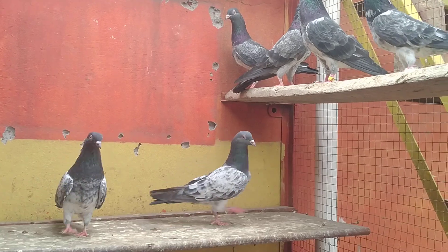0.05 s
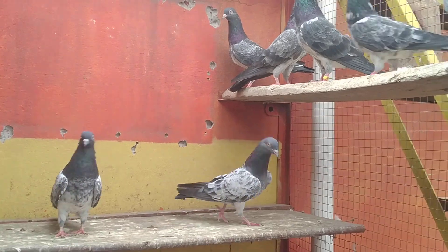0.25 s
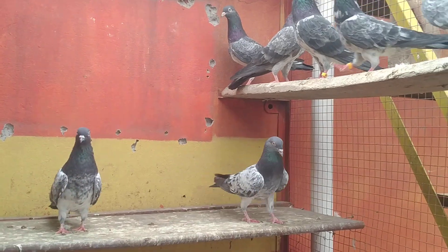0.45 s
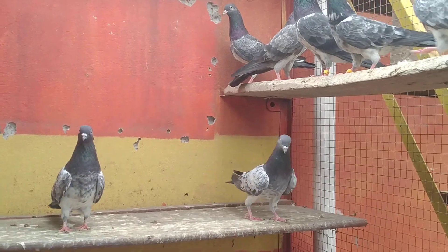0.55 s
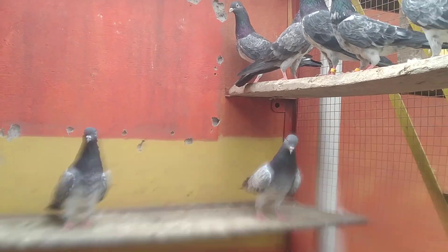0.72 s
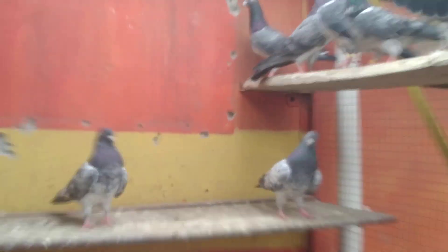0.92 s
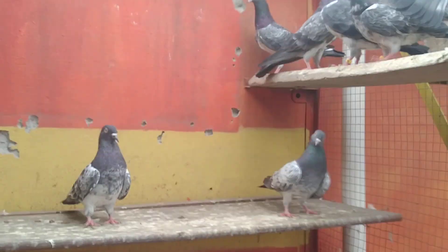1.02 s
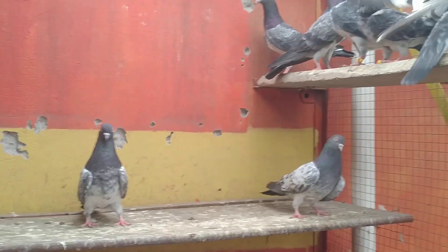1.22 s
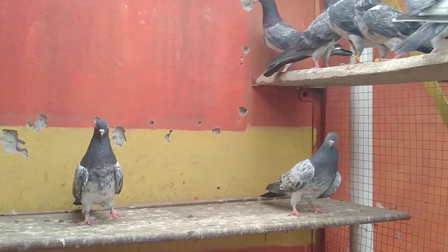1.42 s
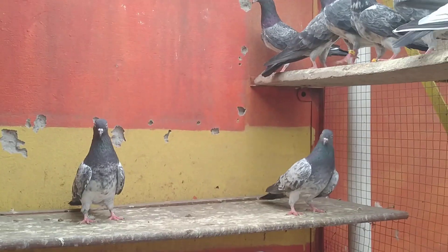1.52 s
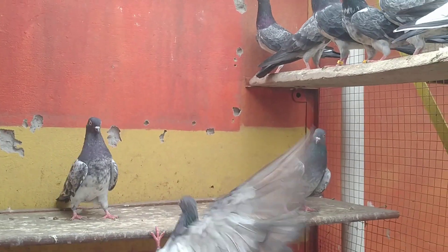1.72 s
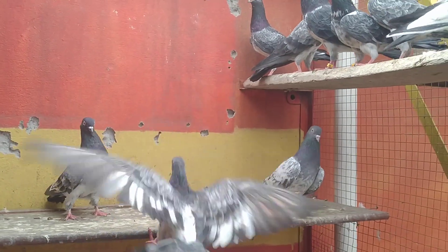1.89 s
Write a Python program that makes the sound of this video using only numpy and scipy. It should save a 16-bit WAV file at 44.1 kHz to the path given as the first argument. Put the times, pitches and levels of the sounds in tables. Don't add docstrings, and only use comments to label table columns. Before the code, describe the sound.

Pigeon wings clap and crackle in rapid bursts, one bird buffeting the microphone as it passes.

```python
import sys
import numpy as np
from scipy import signal
from scipy.fft import rfft, irfft, next_fast_len
from scipy.io import wavfile

SR = 44100
rng = np.random.default_rng(int(sys.argv[2]) if len(sys.argv) > 2 else 0)


def digitize_waveform(pressure):
    field = np.atleast_2d(pressure).T
    bounded = np.clip(field, -1, 1)
    quanta = np.round(bounded * 32767).astype(np.int16)
    wavfile.write(sys.argv[1], SR, quanta)


def makeup_ratio(level_db):
    decades = np.asarray(level_db, float) / 20
    return 10 ** decades


N = 85995
TIME_S = np.arange(N) / SR
STOP = 0.34
ATTACK_S = 0.0003

# pitch_hz [Hz], level_db [dB per Hz]
FEATHER_COLOUR = [(300, -24), (800, -2), (1500, 1), (2600, 2.5), (3600, 1.5), (5000, 4.5), (6000, 4),
                  (7000, -10.5)]


def rms_one(x):
    return x / np.sqrt(np.mean(x ** 2) + 1e-20)


def in_time(rows):
    times_s, values = np.transpose(rows)
    return np.interp(TIME_S, times_s, values)


def band(low_hz, high_hz):
    sos = signal.butter(2, [low_hz, high_hz], "band", fs=SR, output="sos")
    return rms_one(signal.sosfilt(sos, rng.standard_normal(N)))


def coloured(spectrum):
    hz, db = np.transpose(spectrum)
    grid_hz = np.arange(N // 2 + 1) * SR / N + 1
    gain = makeup_ratio(np.interp(np.log(grid_hz), np.log(hz), db))
    return rms_one(irfft(rfft(rng.standard_normal(N)) * gain, N))


def drift(rate_hz):
    r = np.exp(-2 * np.pi * rate_hz / SR)
    noise = rng.standard_normal(N + SR)
    return rms_one(signal.lfilter([1], [1, -2 * r, r * r], noise)[SR:])


def burst(start_s, attack_s, decay_s):
    t = np.maximum(TIME_S - start_s, 0)
    return (1 - np.exp(-t / max(attack_s, 1e-4))) * np.exp(-t / max(decay_s, 3e-4))


def swell(middle_s, width_s):
    return np.exp(-((TIME_S - middle_s) / width_s) ** 2)


def resonance(x, hz, width_hz):
    r = np.exp(-np.pi * width_hz / SR)
    top = [(1 - r * r) / 2, 0, (r * r - 1) / 2]
    return signal.lfilter(top, [1, -2 * r * np.cos(2 * np.pi * hz / SR), r * r], x)


def claps():
    # [dB, relative]
    early_claps = [(0.103, -44.5, 0.042, -15.5, -7.5), (0.16, -30, 0.02, -18, -7),
                   (0.177, -26, 0.022, -11, 12), (0.2029, -8.5, 0.0074, -26.5, 14.5),
                   (0.2105, -14.5, 0.0037, -24.5, 0.5), (0.2225, -15, 0.0081, -20.5, -13),
                   (0.2848, -25.5, 0.0047, -21, 8), (0.2963, -17, 0.011, -27, 6),
                   (0.3392, -13, 0.015, -11, 7), (0.407, -21, 0.035, -9, -8),
                   (0.4347, -23, 0.015, -5.5, -2), (0.4656, -27, 0.0042, -12, 8),
                   (0.5115, -32.5, 0.045, -4, -2), (0.5885, -14, 0.0042, -6, -10.5),
                   (0.6275, -25, 0.013, -16.5, -8), (0.6755, -19.5, 0.017, -17, 1.5),
                   (0.6945, -26, 0.045, -3.5, -5), (0.7525, -4.5, 0.0015, -13, 3.5),
                   (0.7678, -14.5, 0.016, -15.5, 9), (0.8072, -8, 0.005, -3, -10.5),
                   (0.852, -17.5, 0.0036, -21.5, 0)]
    pass_claps = [(0.8997, -3.5, 0.0086, 2, -17), (0.9281, -14, 0.003, -2, -8), (0.9535, -6, 0.004, -8, -4),
                  (0.9914, -1, 0.005, -6, 0), (0.9985, -3, 0.006, -6, -4), (1.0553, -4, 0.006, -4, 1),
                  (1.0861, -7, 0.003, -10, -4), (1.1182, -6, 0.0045, -13, -4),
                  (1.1418, -8, 0.0067, -8, -12), (1.1624, -4.5, 0.0036, -8, -2)]
    late_claps = [(1.2233, -14, 0.0057, -5.5, -5.5), (1.2443, -11, 0.0045, -14.5, -4),
                  (1.2511, -18.5, 0.0069, -5.5, 8), (1.267, -6, 0.0038, -14.5, 1.5),
                  (1.308, -23, 0.02, -17.5, -13), (1.3294, -12.5, 0.015, -14.5, 2),
                  (1.358, -16.5, 0.011, -11.5, -22.5), (1.4334, -12.5, 0.0085, -20, 5.5),
                  (1.4400, -13, 0.0075, -21.5, 5), (1.456, -20.5, 0.025, -11, -7.5),
                  (1.5357, -10, 0.01, -28, -4.5), (1.5785, -16, 0.016, -14, 4),
                  (1.6394, -18, 0.0094, -19, 3), (1.664, -21.5, 0.009, -3, 6.5),
                  (1.6812, -7, 0.0041, -15, -12), (1.7350, -22, 0.012, -10.5, -1),
                  (1.7500, -27, 0.031, -10, -1), (1.831, -31.5, 0.034, -3, 17),
                  (1.909, -38.5, 0.012, -3, -6)]
    snap_hz, snap_width_hz = 4300, 18000
    hiss, puff, snap = np.zeros(N), np.zeros(N), np.zeros(N)
    for start_s, peak_db, decay_s, puff_db, snap_db in [*early_claps, *pass_claps, *late_claps]:
        body = burst(start_s, ATTACK_S, decay_s)
        front = makeup_ratio(snap_db - 5.5) * burst(start_s, ATTACK_S, 0.0018)
        hiss += makeup_ratio(peak_db - 8) * (body + front)
        puff += makeup_ratio(peak_db + puff_db - 2) * burst(start_s, ATTACK_S, decay_s * 1.14)
        snap[int(start_s * SR)] = -makeup_ratio(peak_db + snap_db) * SR / (np.pi * snap_width_hz)
    crackle = makeup_ratio(2 * drift(410.0))
    hiss = hiss * crackle * coloured(FEATHER_COLOUR)
    return hiss + puff * band(194, 1210) + resonance(snap, snap_hz, snap_width_hz)


def strokes():
    # start_s [s], peak_db [dB], pitch_hz [Hz], length_s [s]
    hollow_strokes = [(0.247, -44, 853, 0.017), (0.274, -52.5, 940, 0.015), (0.422, -33.5, 297, 0.011),
                      (0.516, -24.5, 815, 0.025), (0.691, -19, 640, 0.014), (0.795, -21.5, 505, 0.015),
                      (1.195, -17, 826, 0.014), (1.244, -19.5, 476, 0.039), (1.311, -21, 743, 0.016),
                      (1.348, -23.5, 370, 0.027), (1.407, -27.5, 415, 0.077), (1.532, -22, 795, 0.059),
                      (1.609, -24.5, 794, 0.076), (1.803, -30.5, 323, 0.033)]
    deep_strokes = [
        (0.526, -32, 69, 0.024),
        (0.687, -33, 75, 0.044),
        (1.446, -39, 73, 0.17),
        (1.593, -39.5, 79.7, 0.037),
    ]
    spread = 1.6
    out = np.zeros(N)
    for start_s, peak_db, pitch_hz, length_s in [*hollow_strokes, *deep_strokes]:
        shape = swell(start_s + length_s / 3, max(length_s / 2, 0.002))
        out += makeup_ratio(peak_db - 8) * shape * band(pitch_hz / spread, pitch_hz * spread)
    return out


def whistles():
    # middle_s [s], peak_db [dB], pitch_hz [Hz], length_s [s]; the 97 Hz row is the low ring after
    # the inward jump at 0.81 s
    whistle_tones = [(.640, -35, 920, .02), (.661, -27, 830, .014), (.699, -23, 660, .014),
                     (.700, -25, 370, .02), (.713, -27, 550, .014), (.635, -36, 400, .07),
                     (.826, -21, 97, .028), (.961, -17, 185, .03), (1.148, -13, 1100, .007),
                     (1.152, -13, 250, .009), (1.255, -21, 1150, .006), (1.200, -23, 190, .018),
                     (1.133, -21, 300, .014)]
    sag = 0.06
    waver = 1 + 0.04 * drift(66.0)
    out = np.zeros(N)
    for middle_s, peak_db, pitch_hz, length_s in whistle_tones:
        part = (TIME_S - middle_s) / max(length_s, 0.003)
        pitch = pitch_hz * (1 - sag * np.clip(part, -2, 2)) * waver
        turns = np.cumsum(pitch) / SR + rng.random()
        out += makeup_ratio(peak_db) * np.exp(-4 * part ** 2) * np.sin(2 * np.pi * turns)
    return out


def downwash():
    # start_s [s], length_s [s], push [units of the stop], rise_s [s]
    gusts = [
        (.9035, .0180, -6., .003),
        (.9213, .0063, -4., .001),
        (.9378, .0067, -4., .003),
        (1.0055, .0390, -4., .002),
        (1.0568, .0190, -4., .0015),
        (1.0757, .0075, -2.5, .0035),
        (1.0920, .0195, -4., .005),
        (.9120, .0360, -.75, .010),
        (.9680, .0200, -.8, .006),
        (1.0760, .0560, -.8, .009),
    ]
    knocks = [(.8092, .0017, 1., .0005), (.9317, .0013, 2.4, .0006), (.9364, .0014, 2.6, .0006),
              (.9747, .0012, 2.2, .0005), (.9773, .0022, 2.4, .001), (1.0030, .0035, .6, .001),
              (1.0438, .0010, 1.6, .0004), (1.0552, .0024, .8, .0006), (1.0843, .0028, 2.6, .0012),
              (1.0870, .0016, -1., .0004), (1.1183, .0008, 1.8, .0003), (1.1622, .0008, -1., .0003)]
    # start_s [s], push [units of the stop], fade_s [s]
    pressure_jumps = [
        (.8107, -1.3, .0012),
        (1.0446, -1.3, .0015),
        (1.0884, 1.1, .0035),
        (1.1190, -.6, .002),
    ]
    # time_s [s], level_db [dB]
    buffet_level = [(0.0, -62), (0.118, -64.5), (0.206, -55), (0.488, -68.5), (0.678, -76), (0.726, -39.5),
                    (0.782, -58.5), (0.814, -56), (0.874, -37), (0.944, -28), (1.042, -19), (1.064, -32),
                    (1.17, -33), (1.27, -40.5), (1.298, -53), (1.362, -38), (1.406, -52), (1.834, -52.5),
                    (1.95, -55.5)]
    push_sum = np.zeros(N)
    for start_s, length_s, push, rise_s in [*gusts, *knocks]:
        to_edge_s = np.minimum(TIME_S - start_s, start_s + length_s - TIME_S)
        push_sum += push * np.clip(to_edge_s / max(rise_s, 2e-4), 0, 1)
    for start_s, push, fade_s in pressure_jumps:
        push_sum += push * burst(start_s, ATTACK_S, fade_s)
    buffet = makeup_ratio(in_time(buffet_level) + 2 * drift(6.8)) * band(54.4, 300)
    return STOP * push_sum + buffet


def bustle():
    # time_s [s], level_db [dB]
    bustle_level = [(0.0, -55.5), (0.156, -55), (0.216, -30), (0.308, -24), (0.346, -32.5), (0.678, -30.5),
                    (0.88, -26), (0.944, -43), (1.0, -23.5), (1.13, -20.5), (1.232, -25), (1.476, -28.5),
                    (1.65, -24), (1.695, -24.5), (1.728, -37), (1.76, -33.5), (1.808, -35.5), (1.95, -45)]
    rustle = coloured(FEATHER_COLOUR) + makeup_ratio(-4.5) * band(300, 1200)
    lumps_db = 3 * (drift(25.0) + 0.2 * drift(220.0))
    return makeup_ratio(in_time(bustle_level) - 8.5 + lumps_db) * rustle


def loft(x):
    t60_s, wall_cut_hz = 0.24, 7600
    size = next_fast_len(N + SR)
    w = 2 * np.pi * np.arange(size // 2 + 1) / size
    dull = 1 / (1 + 1j * w * SR / (2 * np.pi * wall_cut_hz))
    echoes = 0
    for k, lag_s in enumerate(rng.uniform(0.006, 0.03, size=32)):
        one_round = makeup_ratio(-60 * lag_s / t60_s) * dull * np.exp(-1j * w * lag_s * SR)
        echoes = echoes + (-1) ** k * one_round / (1 - one_round)
    return irfft(rfft(x, size) * echoes, size)[:N]


def air():
    # pitch_hz [Hz], level_db [dB per Hz]
    air_colour = [(100, -31), (250, -30), (550, -2), (1200, -6), (2300, -0.5), (4000, 3), (5500, -18),
                  (7000, 0.5)]
    hum = makeup_ratio(-60.5 + 3.5 * drift(10.0)) * np.sin(2 * np.pi * 397 * TIME_S + 0.24 * drift(4.6))
    return makeup_ratio(-65.5 + 2.0 * drift(15.0)) * coloured(air_colour) + hum


def scene():
    wings = claps() + strokes()
    echoes = makeup_ratio(-20.5) * loft(wings)
    return (wings + echoes + whistles() + downwash() + bustle() + air())[None]


def top_cut(x):
    return signal.sosfilt(signal.butter(12, 8300, fs=SR, output="sos"), x)


def record(dry):
    x = np.clip(dry, -STOP, STOP)
    x = x + makeup_ratio(-48) * (dry - x)
    x = x + makeup_ratio(-9) * resonance(x, 4000, 350)
    ring_hz, ring_q = 115, 2.0
    w = 2 * np.pi * ring_hz / SR
    a, c = np.sin(w) / (2 * ring_q), np.cos(w)
    x = signal.lfilter([(1 + c) / 2, -1 - c, (1 + c) / 2], [1 + a, -2 * c, 1 - a], x)
    x = signal.sosfilt(signal.butter(3, 111, "high", fs=SR, output="sos"), x)
    x = signal.sosfilt(signal.butter(10, 6364, fs=SR, output="sos"), x)
    peak = 0.6
    x = peak * np.tanh(x / peak)
    x = signal.sosfilt(signal.cheby2(14, 60, 8530, fs=SR, output="sos"), x)
    return top_cut(x)


dry = scene()
out = record(dry)
digitize_waveform(out)
```